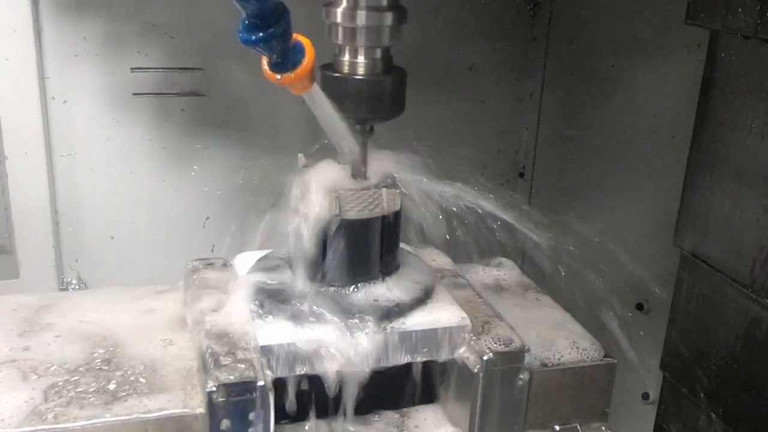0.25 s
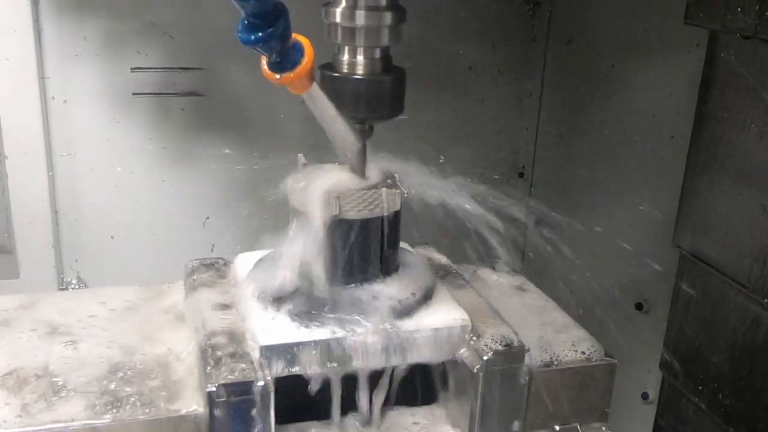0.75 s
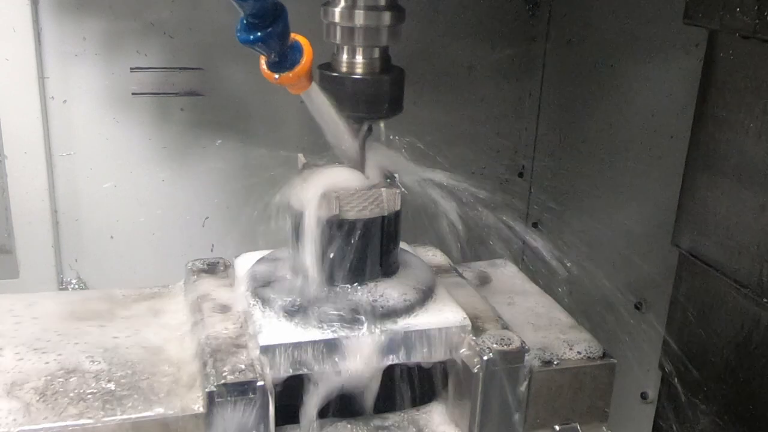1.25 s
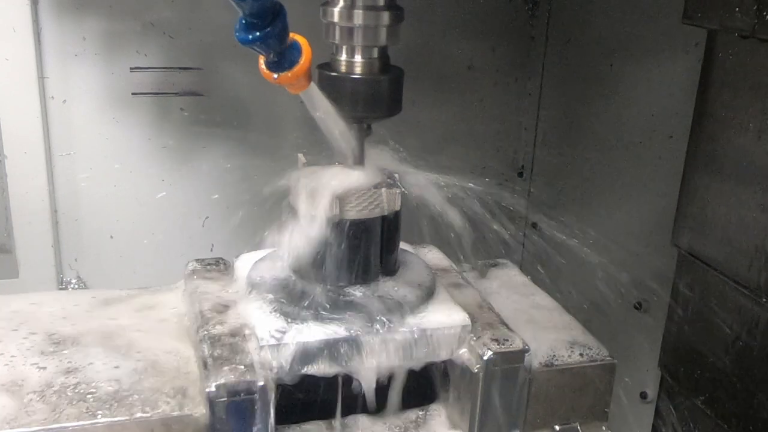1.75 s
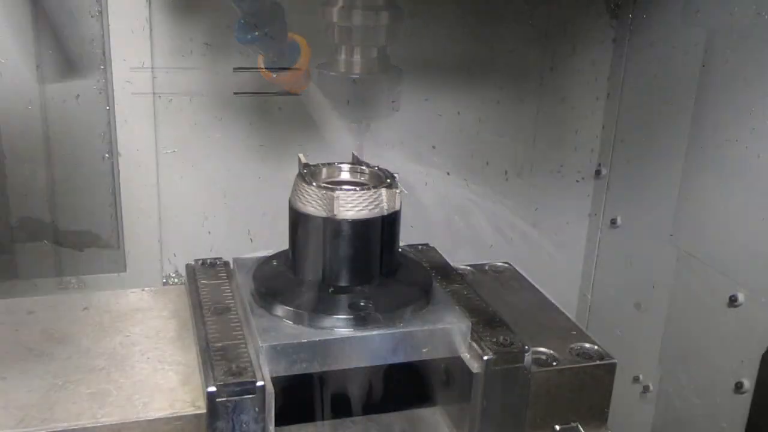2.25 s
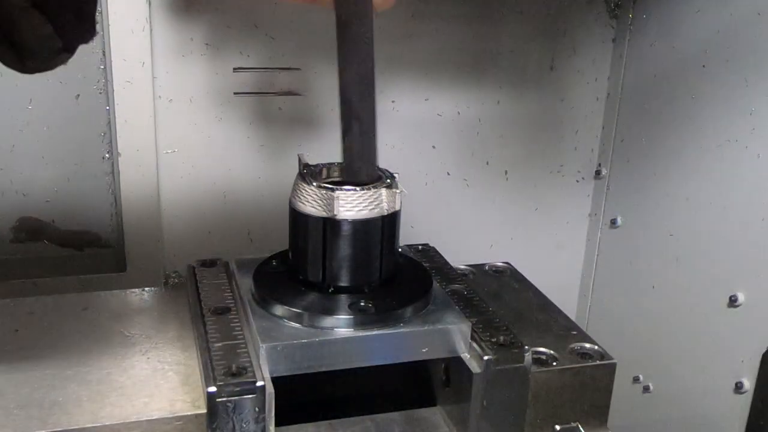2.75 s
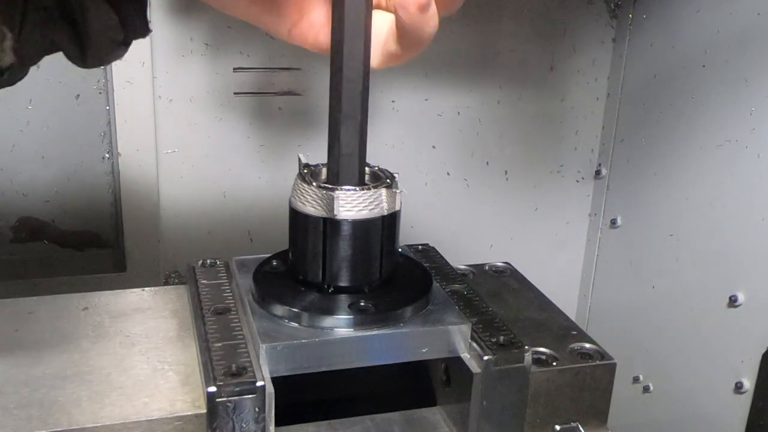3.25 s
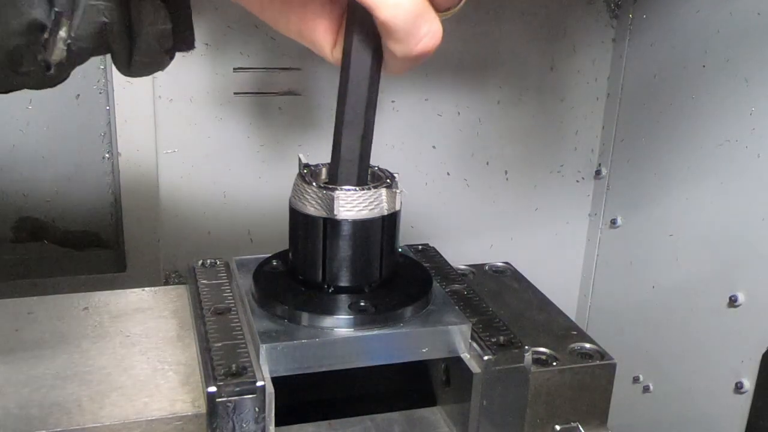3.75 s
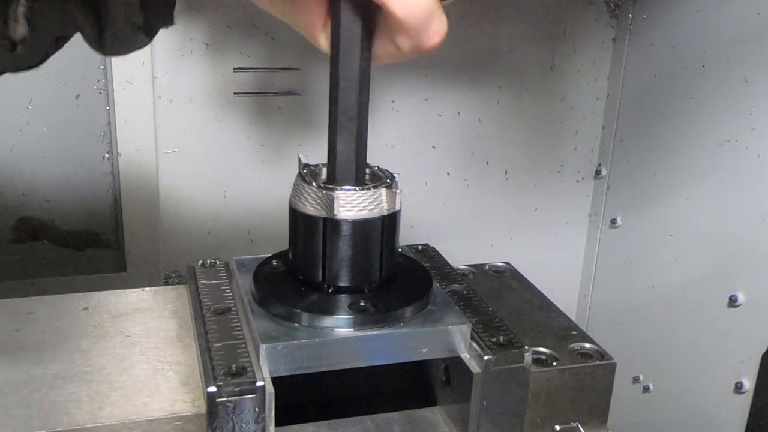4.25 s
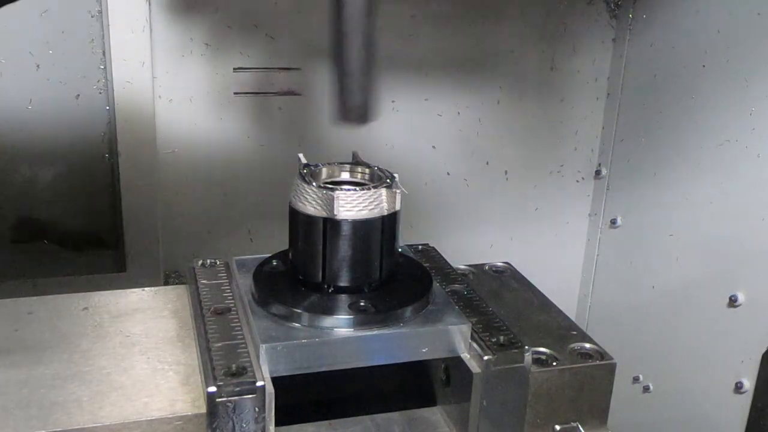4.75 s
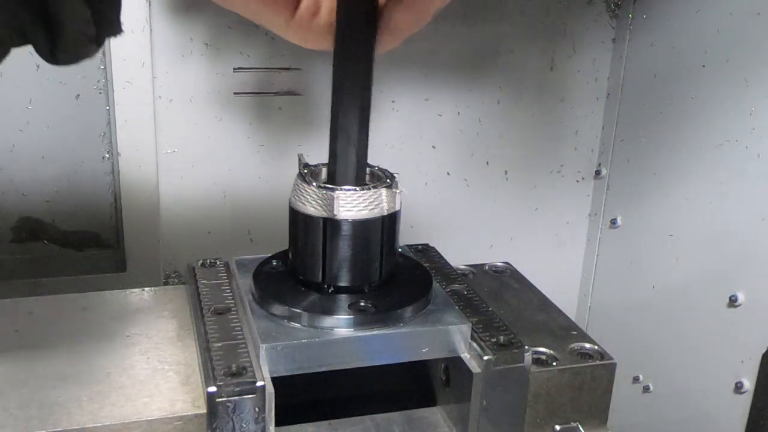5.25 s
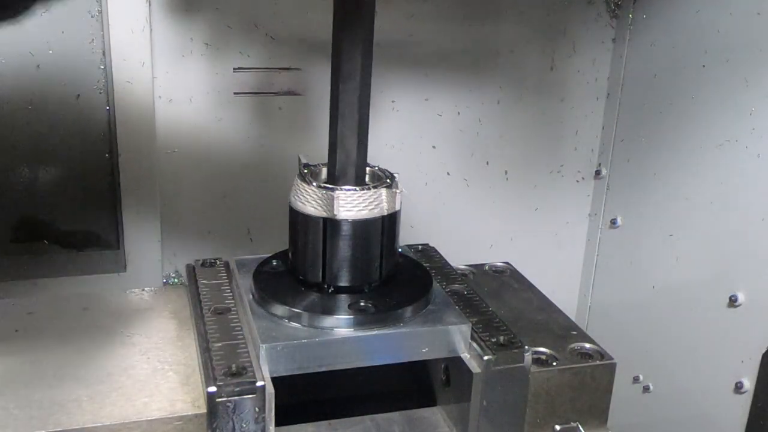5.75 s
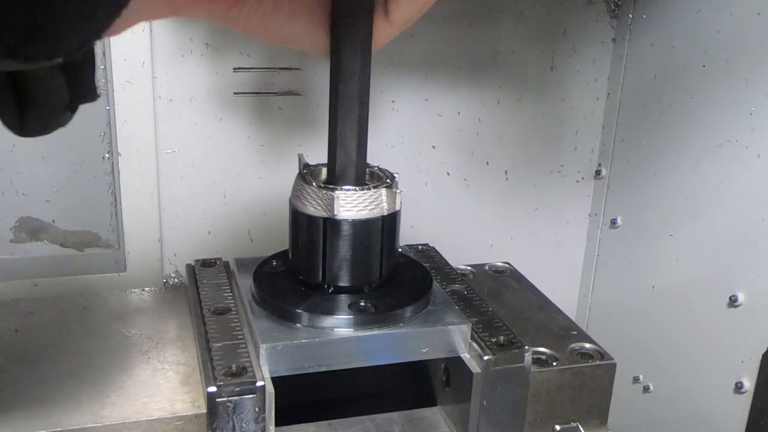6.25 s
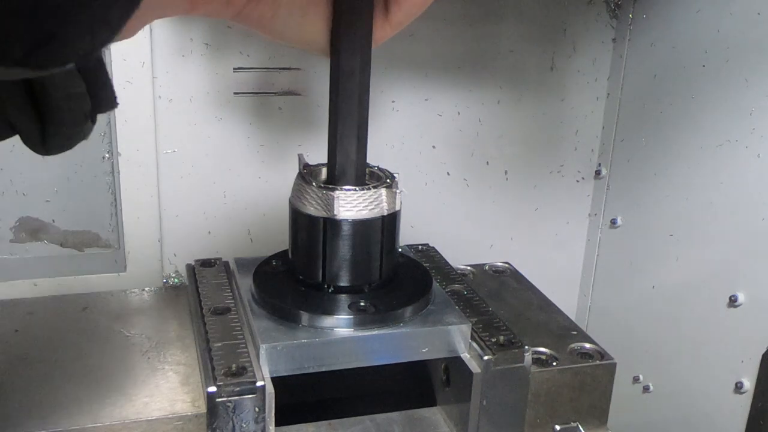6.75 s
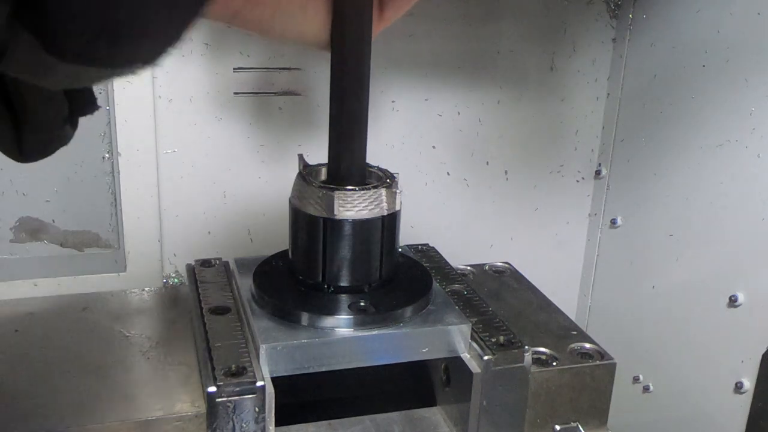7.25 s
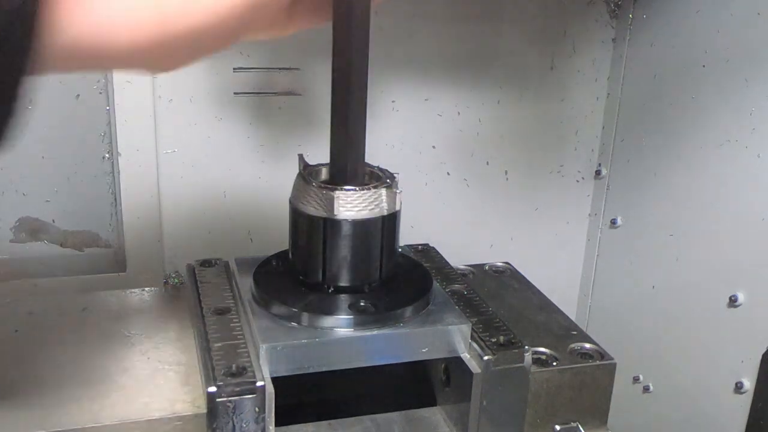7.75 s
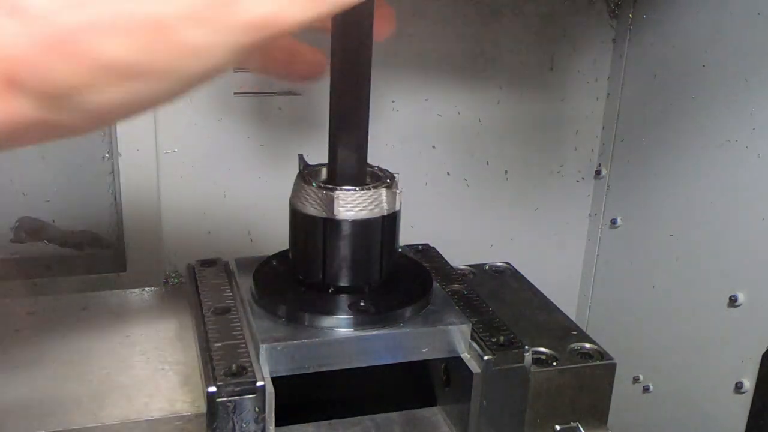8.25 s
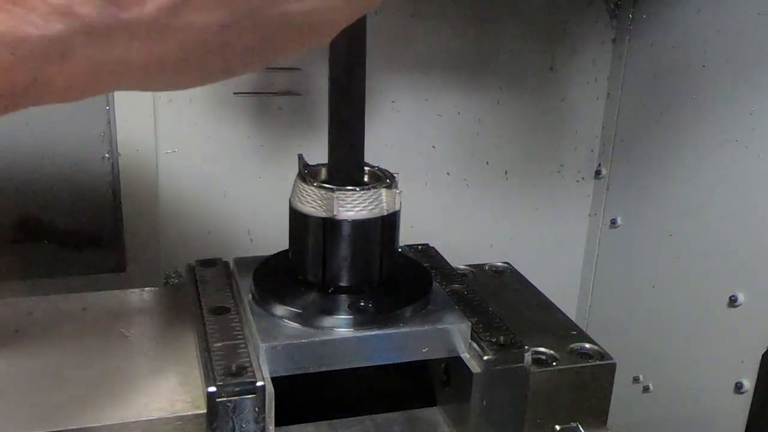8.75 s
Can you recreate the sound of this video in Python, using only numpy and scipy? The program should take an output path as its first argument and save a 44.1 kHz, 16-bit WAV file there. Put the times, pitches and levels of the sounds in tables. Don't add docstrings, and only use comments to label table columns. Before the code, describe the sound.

Inside a metal machine enclosure, a cutter bites wet steel with a loud, nasal, rapidly pulsing ring over gear whine and coolant spray. Just after two seconds it switches abruptly to airy fan hiss. A hex key knocks hard in a clamp, in short dry clusters with rattles and scrapes, while the camera stand thumps softly. The close small stereo microphone briefly dips the hiss after each hard knock.

```python
import sys
import numpy as np
from scipy import signal
from scipy.fft import rfft, irfft
from scipy.io import wavfile
from scipy.ndimage import uniform_filter1d

SR = 44100
rng = np.random.default_rng(int(sys.argv[2]) if len(sys.argv) > 2 else 0)


def gain_from_decibels(decibels):
    exponent = np.asarray(decibels, float) / 20
    return 10 ** exponent


def file_out(sig):
    cols = np.atleast_2d(sig).T
    lim = np.clip(cols, -1, 1)
    pcm = np.round(lim * 32767).astype(np.int16)
    wavfile.write(sys.argv[1], SR, pcm)


N = 397782

CUT_S = 2.158

# pitch_hz, level_db (rms)
GEAR_TONES = [(296, -85.5), (895, -90), (923.5, -68.5), (952, -99), (981, -89), (1348, -60), (1428, -84),
              (1601, -55), (2519, -66)]
# pitch_hz, level_db (rms)
FAN_TONES = [(280, -88), (727, -74), (848, -85), (4457, -70), (5728, -79)]
# time_s, pitch_hz, level_db
FEED_MOTOR = [(.85, 386, -76), (0.998, 430, -76), (1.149, 475, -66.5), (1.3, 510, -60), (1.4, 542, -74),
              (1.6, 586, -78), (1.7, 610, -93)]
# frequency_hz, density_db (per Hz)
SPRAY_SPECTRUM = [(24, -95), (40, -83), (95, -35), (256, -45.5), (300, -41.5), (366, -50), (502, -31.5),
                  (806, -59.5), (890, -30), (1220, -29.5), (1520, 0), (1710, -17.5), (2390, -37),
                  (2590, -31), (4500, -64), (5850, -90), (9900, -120)]
# frequency_hz, density_db (per Hz)
SHOP_SPECTRUM = [(18, -66), (30, -34), (170, -24.5), (591, -26.5), (727, -21.5), (967, -25), (1220, -11),
                 (2000, -1), (3530, -22), (4350, -20), (5080, -23.5), (5930, -23.5), (6760, -22),
                 (10500, -29), (14700, -30)]
# frequency_hz, width_hz, gain_db
BODY_RESONANCES = [(385, 59, -10), (1680, 98, 6), (2009, 72, 9.5), (2480, 30.7, 17.5), (2940, 445, 8),
                   (4130, 67, 7.5), (5925, 424, 13.5), (8650, 860, 6), (9640, 280, 8), (10480, 620, 12.5),
                   (12050, 450, 6)]
# rate_hz, depth_db, phase_rad
RUNOUT_WAVES = [(10.9, 1.7, -.3), (12.75, .8, 2.6), (4.8, .8, 2.7)]
# top_s, peak_db, pitch_hz, after_swing_db
STAND_SWINGS = [(0.07, -61, 101, -20), (0.16, -63, 105, 0), (0.252, -60, 92.5, -20), (0.418, -35, 92, -5),
                (0.539, -52, 90, -7), (0.661, -55, 95, -20), (0.851, -52, 83, -12), (0.971, -65, 94, -20),
                (1.119, -57.5, 94.5, -5), (2.054, -65, 97, -20), (2.605, -34.5, 86.7, -34),
                (2.665, -54, 90.5, -7), (2.945, -40, 85, -29), (3.028, -56.5, 87, -18),
                (3.479, -56.5, 76, -18), (5.134, -43, 86.5, -15), (5.257, -53, 91, -13),
                (5.398, -37.5, 89, -22), (5.475, -46, 97, -40), (5.605, -46, 82.5, -1),
                (6.209, -55, 96, -20), (6.311, -44.5, 92, -23), (6.405, -51, 94.5, -14),
                (6.593, -53.5, 89, -5), (7.45, -61, 91.5, -18), (7.711, -47, 86, -7), (7.988, -44, 84, -14),
                (8.223, -46.5, 92, -14), (8.479, -57, 91, -11), (8.993, -31.5, 90, -22),
                (8.677, -55.5, 80.4, -10),
    (8.793, -67, 92, -10),
]
# start_s, peak_db, ring_hz, brightness_db
HARD_BLOWS = [
    (2.5713, -8.5, 1450, -10.5),
    (2.8943, -5.5, 1776, -15.5),
    (2.9166, -8, 1650, -19),
    (2.9752, -11, 1714, -17),
    (5.052, -4.5, 1640, -20.5),
    (5.1053, -8.5, 1680, -20.5),
    (5.3471, -11, 1640, -22),
    (5.7005, -10.5, 1616, -21.5),
]
# start_s, peak_db, ring_hz, brightness_db
LIGHT_KNOCKS = [(2.9232, -22.5, 1420, -8), (3.3681, -28, 1480, -22), (3.436, -42, 1570, -21),
                (3.4454, -19.5, 1600, -23), (3.4539, -12, 1500, -23.5), (4.687, -26.5, 1610, -11),
                (4.6897, -21.5, 1620, -8.5), (5.0684, -21, 1620, -12), (5.0899, -22, 1540, -17),
                (5.11, -17.5, 1600, -15), (5.1168, -20.5, 1560, -20), (5.2192, -16.5, 1650, -24.5),
                (5.2247, -16.5, 1560, -14), (5.2285, -25, 1580, -6), (5.2335, -12, 1484, -33),
                (5.2354, -11.5, 1640, -19), (5.2407, -11.5, 1660, -16), (5.2452, -16, 1410, -21.5),
                (5.357, -22, 1660, -16), (5.5812, -37.5, 1220, -22), (5.45, -41, 1550, -25),
                (6.471, -30.5, 1720, -28), (6.524, -32.5, 1720, -22), (6.562, -31, 1740, -25.5),
                (6.614, -35, 1700, -27), (5.287, -45, 1500, -33), (5.299, -38, 1410, -22),
                (2.611, -38.5, 1320, -20), (7.6985, -26.5, 1610, -10.5), (8.963, -24, 1680, -19)]
# start_s, length_s, first_db, last_db
KEY_RATTLES = [
    (2.922, 0.016, -36, -27.5),
    (2.965, 0.0055, -35, -29),
    (2.979, .009, -22, -26),
    (3.3626, .001, -29.5, -31),
    (4.676, 0.0065, -25, -28),
    (5.065, 0.018, -22, -32),
    (5.205, 0.0088, -32, -26),
    (5.3275, .0177, -26, -20),
    (5.359, 0.012, -19, -22),
]
# frequency_hz, level_db, t60_s, brightness_share (ratio)
CLAMP_MODES = [(664, -39.5, 0.086, 0.37), (1025, -14.5, 0.04, 0.71), (1305, -69, 0.12, 1),
               (2062, 0, 0.019, 0.35), (2260, -9.5, 0.0069, 0.5), (2983, 3.5, 0.011, 1),
               (3710, -13, 0.013, 0.9), (4470, -21.5, 0.0043, 0.23), (4530, -25.5, 0.013, 0.31),
               (5880, -27, 0.025, 0.87)]
# start_s, peak_db, pitch_hz
KEY_SEATS = [(2.574, -33, 492), (2.924, -33, 2900), (2.983, -32, 3030), (3.368, -53, 508),
             (3.456, -41, 552), (4.688, -30, 3210), (5.073, -35.5, 508), (5.2458, -36.5, 522),
             (5.368, -37.5, 520), (7.6988, -40, 657), (8.963, -33, 498)]
# start_s, top_s, end_s, dull_rub_db, bright_scrape_db
RUB_STROKES = [
    (2.69, 2.76, 2.79, -59.5, -45),
    (2.775, 2.813, 2.87, -54, -45.5),
    (3.41, 3.42, 3.445, -63, -43),
    (5.176, 5.206, 5.208, -71, -44),
    (5.281, 5.322, 5.325, -61, -43),
    (5.536, 5.614, 5.16, -90, -45),
    (6.438, 6.475, 6.45, -77, -52),
    (8.502, 8.592, 8.63, -73, -46.5),
    (8.745, 8.818, 8.7, -62, -57),
    (8.884, 8.96, 9.1, -72, -46),
]
# frequency_hz, lead_rad
PORT_LEAD = [(100, .3), (500, -2), (1200, -1.7), (1750, -2.4), (1950, -4.2), (2450, -4), (2900, -3.1),
             (3600, -.7), (4050, 0), (4400, -2.4), (6400, -3.6), (7600, -3.5), (10400, -6), (11800, -7.8)]
# frequency_hz, difference_db
PORT_TILT = [(100, -3), (250, -1.5), (450, 11), (750, -9.5), (1000, 4), (1500, -3.5), (1850, -1), (2900, 3),
             (3700, -4.5), (4400, 5), (5900, 11.5), (7000, -3.5), (7800, 4), (12000, -2.5)]
# frequency_hz, likeness (ratio)
PORT_LIKENESS = [(100, 0.13), (300, 0.17), (600, 0.99), (900, 0.089), (1300, 0.83), (1850, 0.75),
                 (2100, 0.36), (2900, 1), (3500, 1), (4000, 0.87), (4700, 0.17), (5900, 0.85), (6800, 0.2),
                 (7600, 0.73)]

SPRAY_DB, SHOP_DB = -49.5, -43.5
CHATTER_HZ, TURN_HZ = 1544.5, 3.53
FIRST_BITE_S, BITE_HZ, BITE_COUNT = 0.0238, 28.55, 62
BITE_DB, BITE_MS, SHORTER_MS_PER_DB, BITE_CHANCE_DB = -30.5, 25, 2.2, 0.4
WHISTLE_HZ, WHISTLE_WIDTH_HZ, WHISTLE_DB = 2526, 60, -62
AFTER_S, AFTER_LONGER = 0.0435, 1.23
JOLT_HZ, JOLT_DB, JOLT_EARLY_S, JOLT_S = 175, -17, 0.022, 0.009
BOUNCE_S, BOUNCE_DB, BOUNCE_UP = 0.0042, -23.5, 1.01
RATTLE_GAP_S, RATTLE_HZ, RATTLE_SPREAD_HZ = 0.0042, 1640, 54
RATTLE_BRIGHT_DB, RATTLE_CHANCE_DB = -21, 1.5
STRIKE_S, SOFT_BELOW_DB, SLOWER_PER_DB = 0.0006, -20, 0.16
CRACK_DB, CRACK_S, CRACK_GROWTH = -14, 0.0016, 3.2
DULL_DB, DULL_SHARE = -52, 0.47
LIGHT_DULLS = 0.5
SWELL_DB, UNEVEN_DB = -11, 1.5


def read(points, hz):
    f, value = np.transpose(points)
    return np.interp(np.log(hz + 1), np.log(f + 1), value)


def evened(x):
    return x / np.sqrt(np.mean(x ** 2) + 1e-20)


def add(mix, s, sound):
    part = mix[round(s * SR):][:len(sound)]
    part += sound[:len(part)]


def drift(per_s):
    steps = rng.standard_normal(2000)
    return np.interp(np.arange(N) / SR * per_s, np.arange(2000), steps) * np.sqrt(3 / 2)


def ports(x, stray=None, pan_db=0, turn=1):
    hz = np.fft.rfftfreq(N, 1 / SR)
    tilt = gain_from_decibels(read(PORT_TILT, hz) + pan_db)
    lead = turn * read(PORT_LEAD, hz)
    same = np.clip(read(PORT_LIKENESS, hz), 0, 1)
    summed = np.sqrt(1 + tilt ** 2 + 2 * same * tilt * np.cos(lead)) / 2
    left = right = rfft(x) / summed
    if stray is not None:
        right = same * left + np.sqrt(1 - same ** 2) * rfft(stray) / summed
    return irfft(np.array([left * tilt * np.exp(1j * lead), right]), N)


def hiss(colour_db, patchy_db):
    frames, hz = N // 256 + 5, np.fft.rfftfreq(1024, 1 / SR)
    a, b, c, d, patches = rng.standard_normal((frames, 513, 5)).T
    patches = uniform_filter1d(patches, size=14, axis=0)
    patches = evened(uniform_filter1d(patches, size=8, axis=1))
    z = np.array([a + 1j * b, c + 1j * d]) * gain_from_decibels(colour_db(hz)[:, None] + patchy_db * patches)
    noises = signal.istft(z, nperseg=1024, noverlap=768)[1][:, :N]
    return ports(*evened(noises))


def tones(lines, waver_hz, waver_db):
    out = np.zeros(N)
    for hz, db in lines:
        strength = gain_from_decibels(db + 6.5 + waver_db * drift(14.0))
        out += strength * np.sin(2 * np.pi * np.cumsum(hz + waver_hz * drift(9.0)) / SR)
    return out


def bites():
    s = FIRST_BITE_S + np.arange(BITE_COUNT) / BITE_HZ
    deeper_db = sum(db * np.cos(2 * np.pi * hz * s + phase) for hz, db, phase in RUNOUT_WAVES)
    deeper_db = deeper_db + BITE_CHANCE_DB * rng.standard_normal(len(s))
    length_ms = np.maximum(BITE_MS - SHORTER_MS_PER_DB * deeper_db, 8)
    return zip(s, BITE_DB + deeper_db, length_ms)


def feed_motor():
    t = np.arange(N) / SR
    s, hz, db = np.transpose(FEED_MOTOR)
    level = gain_from_decibels(np.interp(t, s, db, -120, -120) - 1)
    return level * np.sin(2 * np.pi * np.cumsum(np.interp(t, s, hz)) / SR)


def cutter():
    t, swell = np.arange(N) / SR, np.zeros(N)
    for k, (s, db, length_ms) in enumerate(bites()):
        swell += (-1) ** k * gain_from_decibels(db) * np.exp(-np.abs((t - s) / (0.00073 * length_ms)) ** 1.19)
    bend = 1.12 * np.sin(4 * np.pi * TURN_HZ * t + 1.9)
    bend += 0.14 * np.sin(2 * np.pi * TURN_HZ * t + 2.0) + 0.03 * drift(120.0)
    ring = swell * gain_from_decibels(2 + 0.6 * drift(100)) * np.sin(2 * np.pi * CHATTER_HZ * t + bend)

    def colour_db(f):
        return read(SPRAY_SPECTRUM, f) - 10 / (1 + ((f - CHATTER_HZ) / 70) ** 2)

    bite = np.abs(swell) / 0.14
    spray = hiss(colour_db, patchy_db=0.0) * (1.125 + 0.07 * bite)
    gears = tones(GEAR_TONES, waver_hz=2.5, waver_db=1.8) * (0.6 + 0.7 * bite)
    peak = signal.iirpeak(WHISTLE_HZ, WHISTLE_HZ / WHISTLE_WIDTH_HZ, SR)
    whistle = evened(signal.filtfilt(*peak, rng.standard_normal(N)))
    whistle *= gain_from_decibels(WHISTLE_DB + 2.0 * drift(8.26)) * (1 + 14.0 * np.abs(swell))
    return ports(ring + feed_motor() + gears + whistle) + gain_from_decibels(SPRAY_DB) * spray


def shop(cutting):
    def colour_db(f):
        body_db = sum(db / (1 + (2 * (f - hz) / width) ** 2) for hz, width, db in BODY_RESONANCES)
        return read(SHOP_SPECTRUM, f) + body_db

    fans = tones(FAN_TONES, waver_hz=1.2, waver_db=0.7) * gain_from_decibels(-8 * cutting)
    return gain_from_decibels(SHOP_DB) * hiss(colour_db, patchy_db=0.85) + ports(fans)


def stand():
    t, out = np.arange(-0.04, 0.12, 1 / SR), np.zeros(N)
    shape = np.exp(-(t / np.where(t < 0, 0.013, 0.024)) ** 2)
    after_shape = shape ** (1 / AFTER_LONGER ** 2)
    jolt = gain_from_decibels(JOLT_DB) * np.exp(-((t + JOLT_EARLY_S) / JOLT_S) ** 2) * np.cos(2 * np.pi * JOLT_HZ * t)
    for s, db, hz, after_db in STAND_SWINGS:
        swing = np.cos(2 * np.pi * hz * t)
        add(out, s + t[0], gain_from_decibels(db) * (shape * swing + jolt))
        add(out, s + t[0] + AFTER_S, gain_from_decibels(db + after_db) * after_shape * swing)
    return out * gain_from_decibels(np.array([[-16.0], [0]]))


def contacts():
    rows = HARD_BLOWS + LIGHT_KNOCKS
    for s, _, hz, bright_db in HARD_BLOWS:
        rows = rows + [(s + BOUNCE_S, BOUNCE_DB, hz * BOUNCE_UP, bright_db)]
    for start, length, first_db, last_db in KEY_RATTLES:
        for along in np.linspace(0, 1, 1 + round(length / RATTLE_GAP_S)):
            a, b, c, d = rng.standard_normal(4)
            s = start + along * length + 0.00054 * a
            db = first_db + along * (last_db - first_db) + RATTLE_CHANCE_DB * b
            rows = rows + [(s, db, RATTLE_HZ + RATTLE_SPREAD_HZ * c, RATTLE_BRIGHT_DB + 4 * d)]
    return rows


def key():
    t, out = np.arange(4000) / SR, np.zeros(N)

    def dull(db, hz):
        return gain_from_decibels(db - 60 * t / 0.049) * np.sin(2 * np.pi * hz * t) * (1 - np.exp(-t / 0.0025))

    for s, db, hz, bright_db in contacts():
        slower = 1 + SLOWER_PER_DB * max(SOFT_BELOW_DB - bright_db, 0)
        strike = 1 - np.exp(-(t / (STRIKE_S * slower ** 2)) ** 2)
        damped = np.exp(-(t / (0.0022 * slower)) ** 2.08)
        crack = uniform_filter1d(rng.standard_normal(len(t)), size=3) * np.exp(-(t / CRACK_S) ** 2)
        ring = damped * np.sin(2 * np.pi * hz * t) + gain_from_decibels(CRACK_DB + CRACK_GROWTH * db) * crack
        ring += dull(DULL_DB + DULL_SHARE * (db + 18) - db, 508.0)
        for mode_hz, mode_db, t60, share in CLAMP_MODES:
            a, b = rng.standard_normal(2)
            octaves_up = max(np.log2(mode_hz / 2600), 0)
            level_db = mode_db + share * bright_db + LIGHT_DULLS * (db + 7) * octaves_up + 0.45 * a
            ring += gain_from_decibels(level_db - 60 * t / t60) * np.sin(2 * np.pi * mode_hz * (1 + 0.034 * b) * t)
        add(out, s, gain_from_decibels(db + 3.0) * ring * strike)
    for s, db, hz in KEY_SEATS:
        add(out, s, dull(db, hz))
    return signal.sosfilt(signal.butter(2, 380.0, "high", fs=SR, output="sos"), out)


def enclosure(x):
    t = np.arange(6000) / SR
    tails = rng.standard_normal((2, len(t))) * gain_from_decibels(-60 * t / 0.025) * (t > 0.003)
    tails = tails / np.linalg.norm(tails[0])
    return ports(*signal.fftconvolve(x[None], tails, axes=1)[:, :N])


def ducking_db(loud):
    power_db = 10 * np.log10(abs(uniform_filter1d(loud ** 2, size=200)) + 1e-12)
    over_db = np.maximum(1.765 * (power_db + 27.0), 1e-3)
    fade = np.arange(N) / SR / 0.022
    quick_db = np.exp(np.maximum.accumulate(np.log(over_db) + fade) - fade)
    down_db = uniform_filter1d(quick_db, size=150)
    for share, lag_s in ((0.8, 0.16), (3.2, 0.68)):
        keep = np.exp(-1 / (lag_s * SR))
        down_db = down_db + share * signal.lfilter([1 - keep], [1, -keep], quick_db)
    return -down_db


def rubbing():
    t, out = np.arange(N) / SR, np.zeros(N)
    slips = rng.standard_normal(N) * gain_from_decibels(3.5 * drift(200.0))
    bands = []
    for hz, width in ((500.0, 143.0), (1550.0, 550.0)):
        bands.append(evened(signal.filtfilt(*signal.iirpeak(hz, hz / width, SR), slips)))
    uneven_db = UNEVEN_DB * drift(40.0)
    for start, top, end, dull_db, bright_db in RUB_STROKES:
        stroke_db = np.interp(t, (start, top, end), (SWELL_DB, 0, SWELL_DB), -80, -80)
        stroke = uniform_filter1d(gain_from_decibels(stroke_db + uneven_db), size=300)
        out += stroke * (gain_from_decibels(dull_db) * bands[0] + gain_from_decibels(bright_db) * bands[1])
    return out


def scene():
    knocks = key()
    cutting = np.clip((CUT_S - np.arange(N) / SR) / 0.0018, 0, 1)
    floor = shop(cutting) * gain_from_decibels(ducking_db(knocks) - 11.0 * cutting)
    direct = ports(knocks + rubbing(), pan_db=-0.5, turn=0.58)
    handwork = direct + gain_from_decibels(-16.5) * enclosure(knocks)
    return cutting * cutter() + floor + handwork + stand()


def roll_off(x):
    return signal.sosfilt(signal.butter(12, 14850, fs=SR, output="sos"), x)


def record(dry):
    limited = np.clip(dry, -0.93, 0.93)
    mix = signal.sosfiltfilt(signal.butter(6, 14200.0, fs=SR, output="sos"), limited)
    return roll_off(mix)


dry = scene()
out = record(dry)
file_out(out)
```